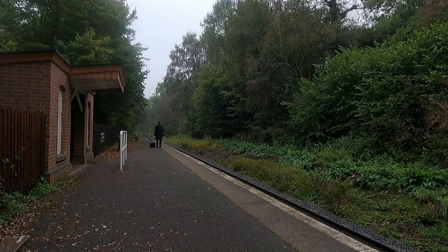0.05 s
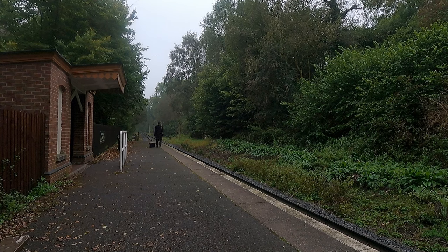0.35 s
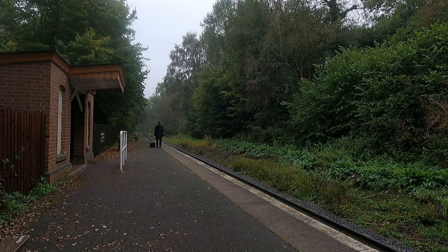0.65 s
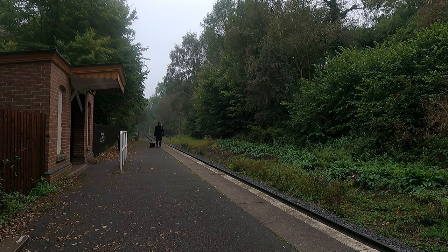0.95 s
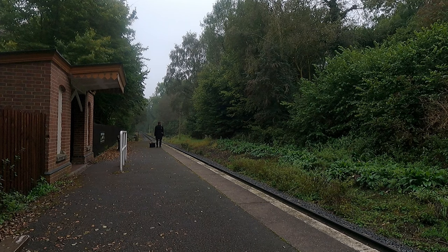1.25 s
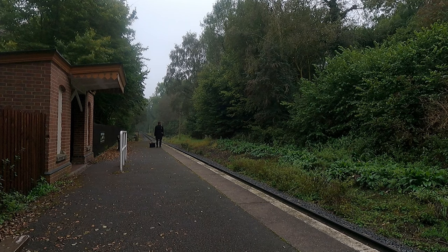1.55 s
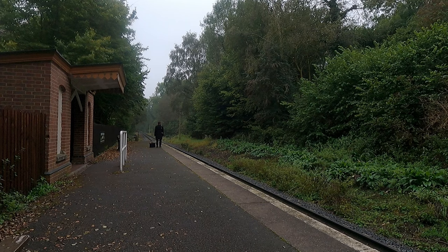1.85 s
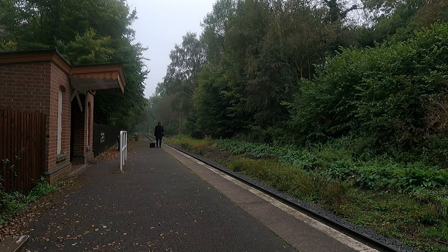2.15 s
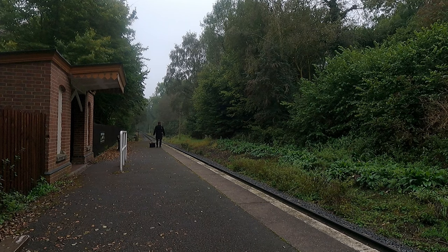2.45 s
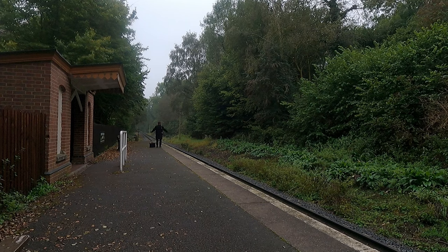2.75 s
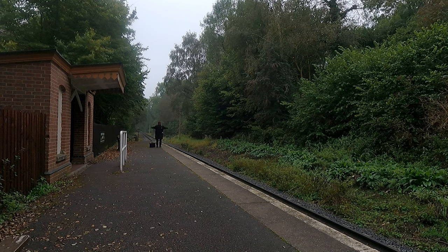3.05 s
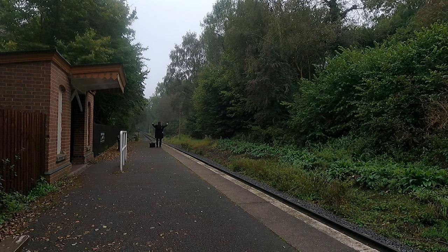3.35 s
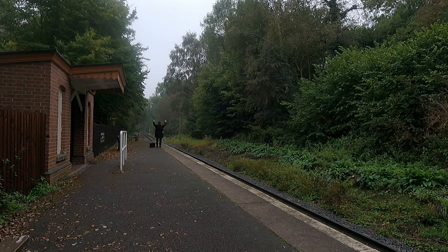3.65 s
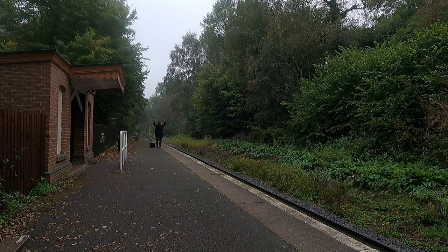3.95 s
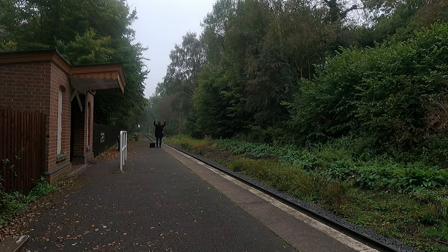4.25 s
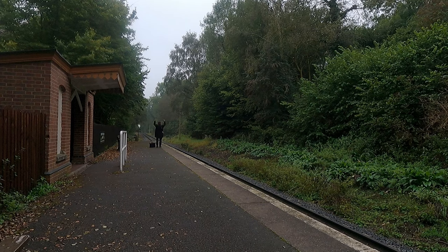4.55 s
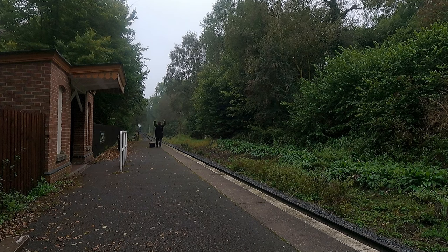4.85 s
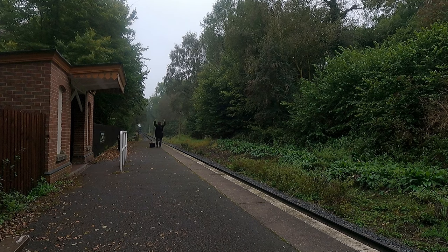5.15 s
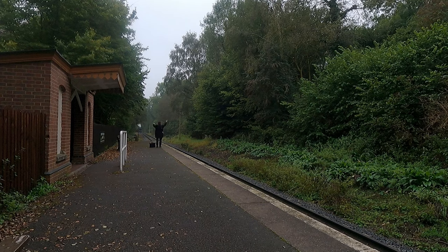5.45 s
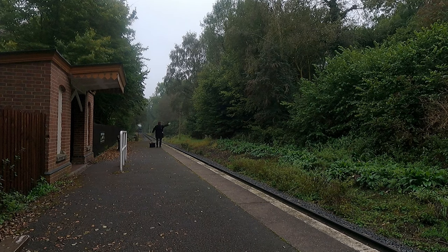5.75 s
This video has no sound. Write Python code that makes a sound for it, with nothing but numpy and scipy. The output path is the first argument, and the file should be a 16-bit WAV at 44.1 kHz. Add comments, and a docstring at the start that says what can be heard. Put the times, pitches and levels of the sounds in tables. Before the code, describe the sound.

At a quiet country platform between woods, leaves hiss softly over a low rumble. Faint jackdaws yelp and chatter through the first half, with a few hoarse caws and thin twitters from small birds. Three dull, distant knocks follow. Near the end a steam locomotive down the line opens its whistle, far louder than everything else: one high note that slides up and holds in a rush of steam, echoing off the trees.

```python
"""Leaf hiss and a low rumble at a country platform between woods, with yelping jackdaws, hoarse caws,
small birds and a few far knocks. At 4.8 s a steam locomotive down the line opens its whistle:
the jet locks to the bell's pipe note, which slides up with pressure and holds in a rush of steam.
A weak lower note, moving air and echoes from the trees make the tone beat and fade."""
import sys
import numpy as np
from scipy import signal
from scipy.fft import rfft, irfft
from scipy.io import wavfile
from scipy.ndimage import uniform_filter1d

SR = 44100
rng = np.random.default_rng(int(sys.argv[2]) if len(sys.argv) > 2 else 0)


def bounce(signal):
    """Save signal as a 16-bit WAV file at the path given by the first command-line argument."""
    frames = np.transpose(np.atleast_2d(signal))
    limited = np.clip(frames, -1, 1)
    pcm = np.round(limited * 32767).astype(np.int16)
    wavfile.write(sys.argv[1], SR, pcm)


N = 255339
T = np.arange(N) / SR
HZ = np.fft.rfftfreq(N, 1 / SR)
OPEN_S, SWELL_S, HARMONIC_LAG_S = 4.792, 0.038, 0.01

# whistle note, rising with steam pressure: t/s, f/Hz
WHISTLE_PITCH = [(4.795, 880), (4.818, 983), (4.845, 986.3), (4.87, 1020), (4.945, 1096), (5.02, 1120),
                 (5.2, 1148), (5.32, 1132), (5.42, 1145), (5.51, 1158), (5.66, 1135), (5.72, 1131),
                 (5.79, 1121)]
# fundamental, heard through moving air: t/s, level/dB
WHISTLE_LEVEL = [(4.815, -23.5), (4.845, -20), (4.865, -24), (4.895, -20.5), (4.97, -23), (5.08, -20.5),
                 (5.1, -25.5), (5.125, -27.5), (5.15, -21), (5.175, -20.5), (5.225, -28.5), (5.247, -23.5),
                 (5.29, -27.5), (5.32, -23.5), (5.36, -20), (5.385, -23.5), (5.418, -21), (5.445, -32),
                 (5.47, -34.5), (5.49, -23), (5.53, -25.5), (5.595, -29), (5.625, -24.5), (5.66, -20.5),
                 (5.696, -41.5), (5.716, -24), (5.742, -22.5), (5.757, -27.5), (5.79, -31)]
# beating lower note: t/s, offset below main note/Hz, level re main note/dB
LOWER_NOTE = [(5.04, 60, -44), (5.1, 58.1, -4), (5.15, 61.8, -17), (5.22, 52.1, -2.5), (5.27, 46, -14.5),
              (5.32, 43.7, -9.5), (5.36, 42.1, -29), (5.43, 41.93, -30), (5.47, 49.9, -5), (5.58, 48, 0.5),
              (5.63, 42.06, -25), (5.79, 42.4, -29)]
# harmonics 2-6: level/dB, loss under full pitch/(dB/octave), sag/(dB/s), skirt/dB, tree scatter/dB
WHISTLE_OVERTONES = [(-44, 14.5, -1.5, -18, -1), (-41.5, 56, 8.5, -14.5, -0.5),
                     (-44.5, 66, 6.5, -8.5, -5.5), (-55, 29.5, 13.5, -9, -5.5), (-63, 41, 6, -12.5, -7.5)]
# fading in moving air, by harmonic number: t/s, gain/dB
OVERTONE_FADES = {2: [(4.84, 5), (4.875, -10.5), (4.905, 2.5), (4.97, -5.5), (5.005, 7.5), (5.08, -4),
                  (5.26, 3.5), (5.39, -3), (5.5, 4), (5.56, 1.5), (5.7, 4), (5.79, 0)], 4: [(4.885, -2.5),
                  (4.91, 9), (4.935, -8), (5.01, 6.5), (5.065, 7), (5.1, -6), (5.125, 9), (5.16, -6),
                  (5.2, 3.5), (5.3, 0), (5.47, 3.5), (5.73, -5), (5.78, 7)]}
# steam jet: f/Hz, density/dB
JET_COLOUR = [(300, -23.5), (560, -1.5), (780, -9.5), (1000, 2), (1350, 3), (1650, 0), (2600, -5),
              (3300, 3), (4400, -0.5), (5400, -4.5), (6500, -14.5), (8000, -18.5), (10000, -34),
              (12000, -52)]
# steam jet: t/s, level/dB
JET_LEVEL = [(4.8, -62), (4.86, -52.5), (4.94, -47.5), (5.02, -46.5), (5.4, -47), (5.79, -47)]
# jet resonances: f/Hz, half width/Hz, level re rush/dB
JET_RESONANCES = [(998, 62, -0.5), (1313, 80, -6.5)]

# near jackdaws: t/s, length/s, first f/Hz, last f/Hz, level/dB
NEAR_YELPS = [(.433, 0.015, 1270, 1190, -56.5), (0.457, .024, 1304, 1176, -58),
              (0.466, .018, 888, 800, -55), (0.485, 0.02, 1290, 1120, -73), (0.676, 0.027, 1270, 1110, -61),
              (0.749, 0.023, 1234, 1040, -58), (0.772, 0.026, 1157, 927, -60),
              (0.867, 0.026, 1270, 1184, -61), (0.902, 0.031, 1390, 1270, -57.5),
              (0.927, 0.04, 1180, 910, -59), (1.177, 0.031, 1314, 1076, -51),
              (1.211, 0.055, 1225, 858, -65), (1.386, 0.025, 1224, 1188, -58.5),
              (1.402, 0.028, 1185, 940, -52), (1.553, 0.023, 960, 725, -59.5),
              (1.666, 0.023, 950, 870, -61), (1.692, 0.023, 854, 740, -62), (1.972, 0.02, 816, 724, -57),
              (2.019, 0.039, 1200, 937, -54), (2.034, 0.047, 1390, 1143, -59),
              (2.053, 0.041, 1190, 844, -61), (2.137, 0.021, 1296, 1180, -61),
              (2.191, 0.019, 936, 760, -59), (2.247, 0.025, 1328, 1250, -58),
              (2.264, 0.023, 1230, 1056, -48.5), (2.284, 0.021, 810, 684, -52),
              (2.29, 0.038, 1074, 737, -57), (2.321, .035, 1230, 1080, -60),
              (2.455, 0.025, 1360, 1240, -59), (2.478, 0.043, 1220, 730, -54),
              (2.512, 0.034, 1218, 1016, -58), (2.544, 0.027, 1278, 1164, -54),
              (2.572, .04, 1230, 964, -62), (2.621, 0.034, 1217, 1175, -53), (2.675, .03, 1270, 1140, -70),
              (2.711, 0.033, 1033, 740, -58), (2.778, 0.017, 1260, 1100, -55.5),
              (2.796, 0.034, 1106, 755, -62), (2.989, 0.023, 1236, 1110, -57),
              (3.165, 0.048, 1336, 1080, -59.5), (3.39, 0.029, 1295, 1194, -60),
              (3.424, 0.033, 1237, 1125, -58.5)]
# far jackdaws: t/s, call level/dB
FLOCK_LEVEL = [(.8, -77), (1.7, -66), (2.05, -62.5), (2.35, -63), (2.7, -63.5), (2.95, -67), (4.7, -68.5)]
# jackdaw voice: harmonic number, relative level/dB
YELP_HARMONICS = [(1, -10), (2, 7), (3, -12), (4, -11)]
# far caws: t/s, length/s, centre f/Hz, level/dB
CAW_CALLS = [(0.285, 0.087, 1280, -65), (0.761, 0.086, 990, -59.5), (.87, 0.17, 1270, -64.5),
             (1.084, .1, 1080, -62), (1.65, 0.077, 1600, -62), (1.76, 0.081, 1410, -62.5)]
# thin bird notes: t/s, length/s, first f/Hz, level/dB
SONG_NOTES = [(0.229, 0.071, 3630, -64.5), (0.438, 0.038, 3480, -62), (0.802, 0.044, 5170, -62),
              (1.136, 0.093, 3990, -62), (1.156, 0.029, 1386, -53.5), (1.157, .026, 5500, -61),
              (1.24, .12, 4180, -65), (2.678, 0.023, 1353, -51.5), (3.756, 0.19, 3550, -61)]
# small-bird bursts: t/s, length/s, centre f/Hz, chip level/dB
TWITTER_BURSTS = [(.66, .3, 4610, -64), (1.16, 0.1, 4400, -70), (1.628, 0.15, 3730, -61),
                  (1.68, 0.093, 5020, -68)]
# far knocks: t/s, level/dB, share of full ring time
KNOCK_HITS = [(3.66, -50, 0.62), (4.32, -52, .5), (4.466, -53.5, 0.71)]
# modes of a knock: f/Hz, relative level/dB, full t60/s
KNOCK_RING = [(1110, 1.5, 0.11), (1270, -3.5, 0.34), (1526, -4, 0.062), (2340, -3.5, 0.138)]

# rumble, far drone, faint hum: t/s, level/dB (rumble before trim)
RUMBLE_LEVEL = [(0, -59), (1.2, -59), (1.5, -55), (2.35, -56), (2.9, -63), (3.8, -56.5), (4.3, -59.5),
                (4.5, -50.5), (4.7, -62), (5.79, -67.5)]
DRONE_LEVEL = [(0, -60), (4.8, -60), (5.1, -66.5), (5.79, -67)]
HUM_LEVEL = [(0, -75), (1.25, -73), (1.37, -57.5), (1.52, -63), (1.7, -82), (2.1, -78), (2.8, -73),
             (3.2, -65), (3.5, -68), (4.25, -70.5), (4.45, -62.5), (4.7, -73), (5.79, -69)]
# air in the trees, before trim: t/s, wash level/dB, leaf level/dB
BREEZE_LEVELS = [(0, -61, -68.5), (.65, -59.5, -64.5), (.85, -58.5, -65), (1.15, -57.5, -64),
                 (1.4, -60, -63.5), (2.4, -57.5, -62), (3.3, -58, -61), (3.8, -56, -60.5), (4.7, -58, -61)]
# background spectra: f/Hz, density/dB
RUMBLE_SPECTRUM = [(8, -25.5), (22, -4.5), (33, -1), (52, -9), (75, -19.5), (110, -23.5), (250, -64.5)]
DRONE_SPECTRUM = [(60, -26.5), (115, -12.5), (155, 0), (195, 1), (245, -5.5), (320, -3.5), (480, -7.5),
                  (800, -16.5), (1500, -62.5)]
WASH_SPECTRUM = [(250, -14), (550, -4.5), (850, 0.5), (1030, 5.5), (1160, 2.5), (1320, 5.5), (1600, 1.5),
                 (2300, -3.5), (2800, -11.5), (4000, -17.5), (8000, -57.5)]
LEAF_SPECTRUM = [(1800, -9.5), (2900, -4.5), (3500, -4), (4050, -3), (4750, 2.5), (5500, -1.5),
                 (6400, -5.5), (7200, -12), (8000, -19), (9500, -25.5), (12000, -46)]
# echoes off the station and the wood's edge: delay/s, relative level/dB
ECHO_TAPS = [(.046, -23), (.142, -15.5), (.19, -14), (.298, -21)]
# left-right likeness of noise: f/Hz, correlation
COHERENCE = [(40, .99), (130, .85), (300, .88), (1000, .94), (2000, .9), (4000, .87), (8000, .8)]
# microphone balance: f/Hz, left over right/dB
MIC_BALANCE = [(60, -0.2), (250, -1), (900, 0.2), (2300, 1), (4500, 2), (8000, 3)]


def whistle(jitter=0.0025, flutter=0.094, full_hz=1120, fading_db=1.5, lower_overtone_db=-10):
    """The steam jet locks to the bell's pipe note; turbulence shakes its pitch and strength."""
    pitch_hz, = curve(WHISTLE_PITCH)
    valve = np.clip((T - OPEN_S) / SWELL_S, 0, 1)
    phase = phase_of(pitch_hz * (1 + jitter * wander(45)))
    strength = valve * (1 + flutter * wander(60))
    beat_hz, lower_db = curve(LOWER_NOTE)
    lower_phase = phase - phase_of(beat_hz * (1 + .15 * wander(8)))
    full_pressure = np.clip((T - 5.02) / .12, 0, 1)

    def harmonic(k, skirt_db):
        """Harmonic k of both notes in a skirt of turbulence; overtones sputter."""
        skirt = wander(69) * np.cos(k * phase) + wander(71) * np.sin(k * phase)
        sputter = amp(1.2 * min(k - 1, 2.4) * wander(33))
        lower_gain = amp(lower_db) if k == 1 else amp(lower_overtone_db) * full_pressure
        notes = np.cos(k * phase) + lower_gain * np.cos(k * lower_phase)
        return strength * sputter * (notes + amp(skirt_db) * skirt)

    fundamental = woods(harmonic(1, skirt_db=-32), wet_db=-9, t60_s=1.1, width=0.44)
    out = onset(1) * ride_level(fundamental, curve(WHISTLE_LEVEL)[0], span_s=0.033)
    flat_octaves = np.maximum(np.log2(full_hz / pitch_hz), 0)
    held_s = np.maximum(T - OPEN_S, 0)
    for k, (db, loss_db_per_oct, sag_db_per_s, skirt_db, wet_db) in enumerate(WHISTLE_OVERTONES, 2):
        rise_db = -loss_db_per_oct * flat_octaves
        level_db = db + rise_db - sag_db_per_s * held_s + fading_db * wander(7.6)
        if k in OVERTONE_FADES:
            level_db += curve(OVERTONE_FADES[k])[0]
        tone = amp(rise_db) * onset(k) * harmonic(k, skirt_db)
        echoing = woods(tone, wet_db, t60_s=1.3, width=0.4)
        out += onset(k) * ride_level(echoing, level_db, span_s=0.069)
    return out


def onset(k):
    """The valve opens smoothly; harmonic k speaks just after the one below."""
    opening = np.clip((T - OPEN_S - (k - 1) * HARMONIC_LAG_S) / SWELL_S, 0, 1)
    return np.sin(np.pi / 2 * opening) ** 2


def steam(unrest_db=.7):
    """Rush of the jet, ringing loosely on both sides of the held note."""
    rings = sum(amp(db) * band(noise(JET_COLOUR), hz, width_hz) for hz, width_hz, db in JET_RESONANCES)
    level_db = curve(JET_LEVEL)[0] + unrest_db * wander(25)
    return onset(1) * amp(level_db) * (noise(JET_COLOUR) + rings)


def jackdaws(far_calls=130):
    """Near birds call clearly; the flock behind chatters harshly at random."""
    near, far = np.zeros(N), np.zeros(N)
    shake = np.array([wander(hz) for hz in (480, 260, 260)])
    for start_s, length_s, first_hz, last_hz, db in NEAR_YELPS:
        call = yelp(length_s, first_hz, last_hz, shake[:, int(start_s * SR):], rough=.022, rasp=.27)
        add(near, start_s, amp(db) * call)
    flock_db, = curve(FLOCK_LEVEL)
    for k, (when, size, pitch) in enumerate(rng.random((far_calls, 3))):
        start_s = FLOCK_LEVEL[-1][0] * (k + when) / far_calls
        hz, at = 740 + 560 * pitch, int(start_s * SR)
        call = yelp(.03 + .03 * size, hz, .7 * hz, shake[:, at:], rough=.035, rasp=.45)
        add(far, start_s, amp(flock_db[at]) * call)
    return woods(near, wet_db=-7.5, t60_s=.36, echo_db=-8) + woods(far, wet_db=-1, t60_s=.3)


def yelp(length_s, first_hz, last_hz, shake, rough, rasp):
    """One falling call: strong second harmonic, each harmonic in a skirt of rasp."""
    progress = np.linspace(0, 1, int(length_s * SR))
    jitter, rasp_sin, rasp_cos = shake[:, :len(progress)]
    glide_hz = first_hz + (last_hz - first_hz) * progress ** 1.3
    phase = phase_of(glide_hz * (1 + rough * jitter))
    voice = sum(amp(db) * ((1 + rasp * rasp_sin) * np.sin(k * phase) + rasp * rasp_cos * np.cos(k * phase))
                for k, db in YELP_HARMONICS)
    return unit(voice) * signal.windows.tukey(len(voice), .35)


def caws(rattle_hz=95, half_width_hz=150):
    """Far, hoarse calls: rattling breath through one throat resonance."""
    out = np.zeros(N)
    rattle = 1 + np.cos(phase_of(rattle_hz * (1 + .1 * wander(17.8))))
    breath = rattle * rng.standard_normal(N)
    for start_s, length_s, hz, db in CAW_CALLS:
        call = band(breath, hz, half_width_hz)[int(start_s * SR):][:int(length_s * SR)]
        add(out, start_s, amp(db) * unit(call) * signal.windows.tukey(len(call), .5))
    return woods(out, wet_db=-6.5, t60_s=0.17, echo_db=-10)


def songbirds(waver=0.021, droop=0.047):
    """Thin, wavering, drooping notes from deep in the trees."""
    out, shake = np.zeros(N), wander(90)
    for start_s, length_s, first_hz, db in SONG_NOTES:
        size = int(length_s * SR)
        glide_hz = first_hz * np.linspace(1, 1 - droop, size)
        hz = glide_hz * (1 + waver * shake[int(start_s * SR):][:size])
        add(out, start_s, amp(db) * np.sin(phase_of(hz)) * signal.windows.tukey(size, .6))
    return woods(out, wet_db=-6.5, t60_s=0.69, echo_db=-3)


def twitters(chips=13, chip_s=0.0142, spread=0.148, fall=0.11):
    """Small birds scatter quick, falling chips around one pitch per burst."""
    out, progress = np.zeros(N), np.linspace(0, 1, int(chip_s * SR))
    for start_s, length_s, centre_hz, db in TWITTER_BURSTS:
        for k, (when, pitch) in enumerate(rng.random((chips, 2))):
            chip_hz = centre_hz * (1 + spread * (2 * pitch - 1))
            glide_hz = chip_hz * (1 + fall * (.5 - progress))
            chip = np.sin(phase_of(glide_hz)) * np.sin(np.pi * progress)
            add(out, start_s + length_s * (k + when) / chips, amp(db) * chip)
    return woods(out, wet_db=-2, t60_s=.4, echo_db=-8)


def knocks(thud_db=-2, thud_s=0.0094):
    """Far, dull blows: a short thud and a brief ring."""
    out, t = np.zeros(N), np.arange(SR // 4) / SR
    thud = band(rng.standard_normal(N), hz=1380, half_width_hz=297)[:len(t)] * np.exp(-t / thud_s)
    for start_s, db, ring_share in KNOCK_HITS:
        ring = sum(amp(mode_db - 60 * t / (ring_share * t60_s)) * np.sin(2 * np.pi * hz * t)
                   for hz, mode_db, t60_s in KNOCK_RING)
        add(out, start_s, amp(db) * (ring + amp(thud_db) * thud))
    return woods(out, wet_db=-17, t60_s=0.25, echo_db=-4)


def open_air(rumble_trim_db=1.55, wash_trim_db=-1.0, leaf_trim_db=2.0, gust_db=0.5):
    """Low rumble, a far drone with a hum in it, and air in the trees: wash and leaf hiss."""
    wash_db, leaf_db = curve(BREEZE_LEVELS)
    stir_db = .7 * wander(12)
    rumble = amp(curve(RUMBLE_LEVEL)[0] + rumble_trim_db + gust_db * wander(8)) * noise(RUMBLE_SPECTRUM)
    drone = amp(curve(DRONE_LEVEL)[0] + 0.2 * wander(7)) * noise(DRONE_SPECTRUM)
    hum = amp(curve(HUM_LEVEL)[0]) * band(noise(DRONE_SPECTRUM), hz=316, half_width_hz=12)
    wash = amp(wash_db + wash_trim_db + stir_db) * noise(WASH_SPECTRUM)
    leaves = amp(leaf_db + leaf_trim_db + .5 * stir_db) * noise(LEAF_SPECTRUM)
    return rumble + drone + hum + wash + leaves


def woods(x, wet_db, t60_s, width=0.6, echo_db=0, trunks_per_s=2000, build_s=.04):
    """Direct sound, a few distinct echoes and the scatter of many trunks, in stereo."""
    t = np.arange(2 * SR) / SR
    trunks = rng.standard_normal((2, len(t))) * (rng.random((2, len(t))) < trunks_per_s / SR)
    trunks *= amp(-60 * t / t60_s) * (1 - np.exp(-t / build_s))
    mid, side = amp(wet_db) * trunks / np.linalg.norm(trunks, axis=1, keepdims=True)
    mid[0] = 1  # direct path
    for delay_s, db in ECHO_TAPS:
        mid[round(delay_s * SR)] += amp(db + echo_db)
    response = np.array([mid + width * side, mid - width * side])
    return signal.fftconvolve(x[None], response, axes=1)[:, :N]


def ride_level(x, db, span_s):
    """Sets a tone's slow level; keeps beats quicker than the span."""
    size = int(span_s * SR)
    power = abs(uniform_filter1d(uniform_filter1d((x ** 2).mean(0), size), size // 2))
    return amp(db) * x / np.sqrt(power + .01)


def noise(colour):
    """Coloured stereo noise, partly coherent, rms 1."""
    left, other = rfft(rng.standard_normal((2, N)))
    same = np.clip(spectrum(COHERENCE, HZ), 0, 1)
    right = same * left + np.sqrt(1 - same ** 2) * other
    return unit(irfft(np.array([left, right]) * amp(spectrum(colour, HZ)), N))


def band(x, hz, half_width_hz):
    """Soft resonance, rms 1."""
    return unit(irfft(rfft(x) / (1 + ((HZ - hz) / half_width_hz) ** 2), N))


def wander(rate_hz, points=8192):
    """Low-passed random drift, rms about 1."""
    hz = np.fft.rfftfreq(points, T[-1] / points)
    slow = irfft(rfft(rng.standard_normal(points)) / (1 + (hz / rate_hz) ** 2))
    return np.interp(T, np.linspace(0, T[-1], points), unit(slow))


def spectrum(rows, hz):
    """Table interpolated over log frequency."""
    row_hz, values = np.transpose(rows)
    return np.interp(np.log(hz + 1), np.log(row_hz), values)


def curve(rows):
    """Each value column of a time table, per sample."""
    times_s, *columns = np.transpose(rows)
    return [np.interp(T, times_s, column) for column in columns]


def add(mix, start_s, sound):
    """Mixes a sound in at start_s."""
    part = mix[round(start_s * SR):][:len(sound)]
    part += sound[:len(part)]


def phase_of(hz):
    """Running phase in radians."""
    return 2 * np.pi * np.cumsum(hz) / SR


def amp(db):
    """Decibels to gain."""
    return 10 ** (np.asarray(db) / 20)


def unit(x):
    """Scales to rms 1."""
    return x / np.sqrt(np.mean(x ** 2) + 1e-20)


def scene():
    """Everything heard from the platform."""
    return whistle() + steam() + jackdaws() + caws() + songbirds() + twitters() + knocks() + open_air()


def record(dry, lag_samples=0.49, cutoff_hz=12000):
    """Two close, band-limited microphones; the left slightly later and brighter."""
    hz = np.linspace(0, SR / 2, 513)
    tilt = amp(spectrum(MIC_BALANCE, hz) / 2)
    left, right = (signal.firwin2(255, hz, gain * (hz < cutoff_hz), window=("kaiser", 9), fs=SR)
                   for gain in (tilt, 1 / tilt))
    left = (1 - lag_samples) * left + lag_samples * np.roll(left, 1)
    return signal.oaconvolve(dry, np.array([left, right]), "same", axes=1)


dry = scene()
out = record(dry)
bounce(out)
```